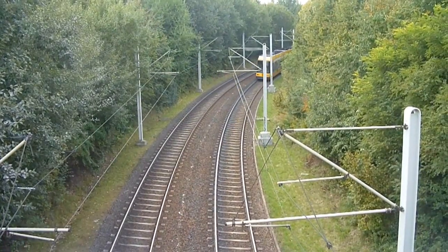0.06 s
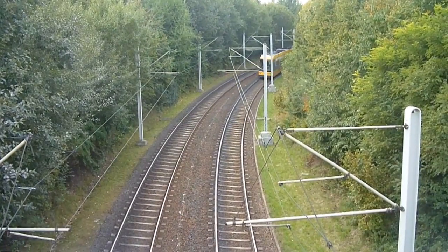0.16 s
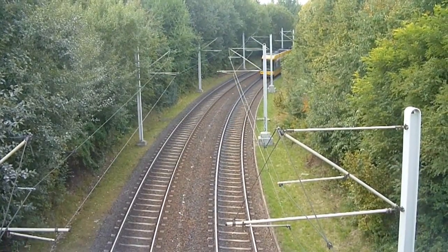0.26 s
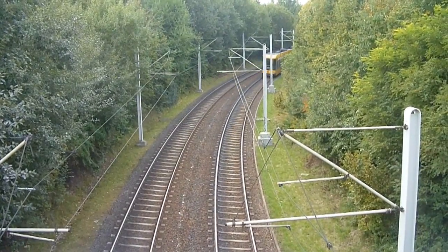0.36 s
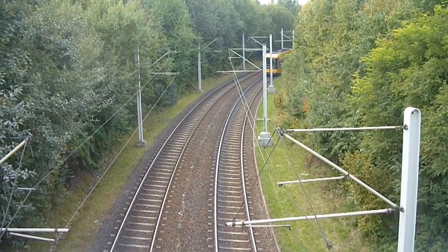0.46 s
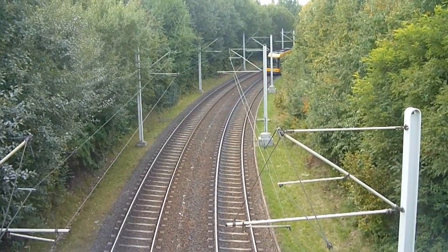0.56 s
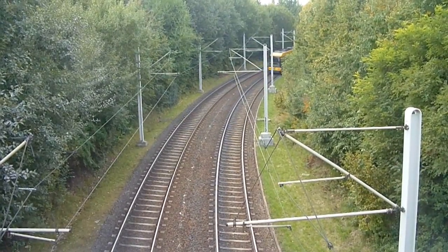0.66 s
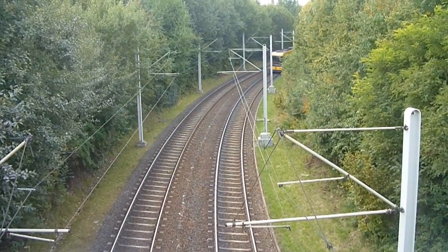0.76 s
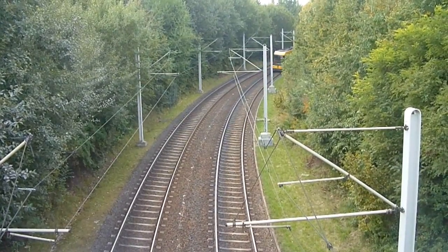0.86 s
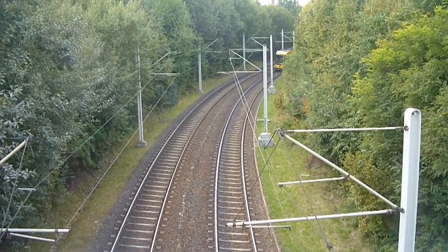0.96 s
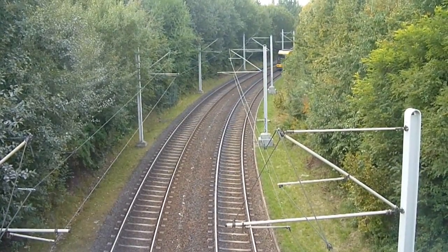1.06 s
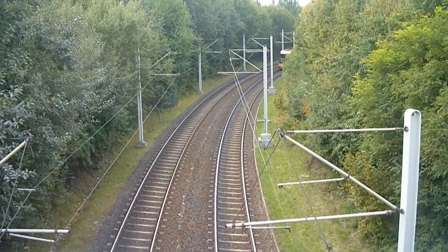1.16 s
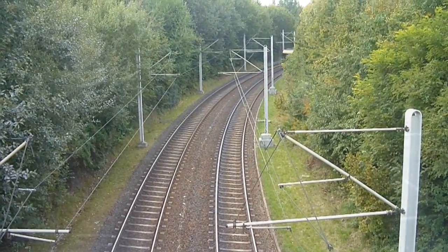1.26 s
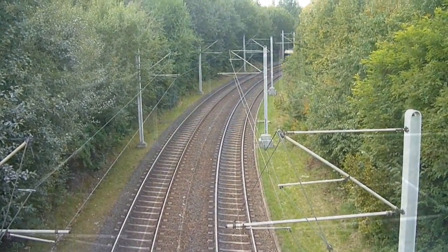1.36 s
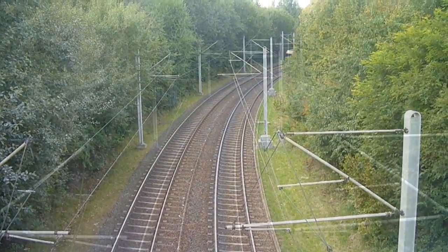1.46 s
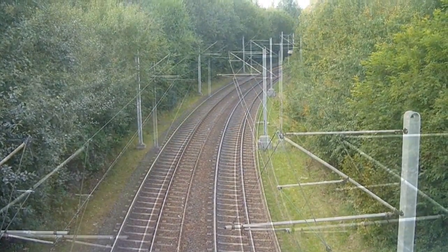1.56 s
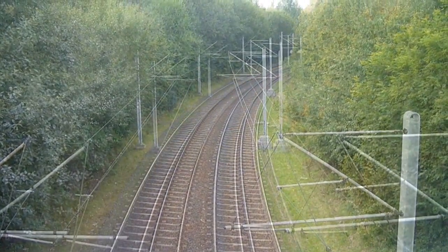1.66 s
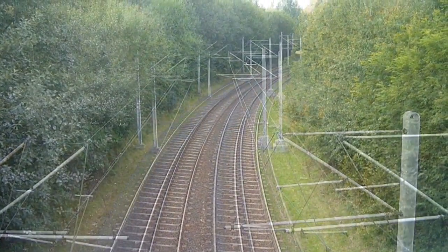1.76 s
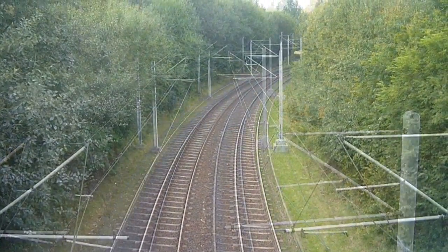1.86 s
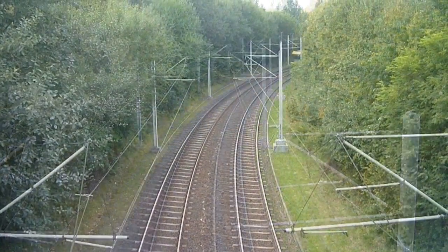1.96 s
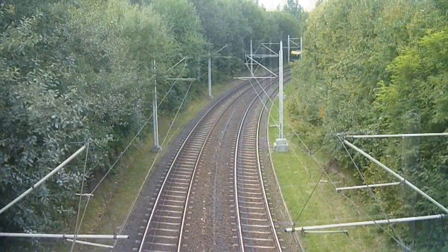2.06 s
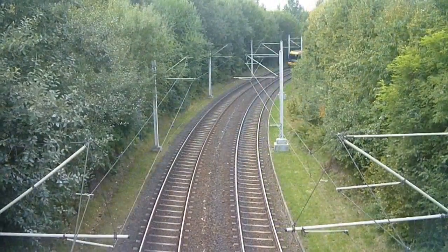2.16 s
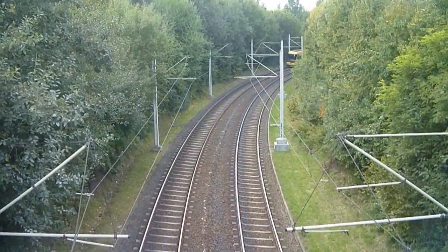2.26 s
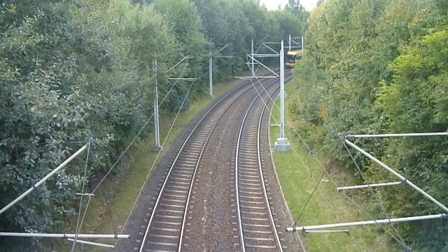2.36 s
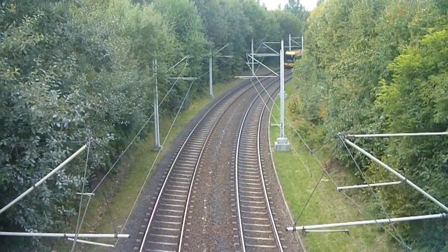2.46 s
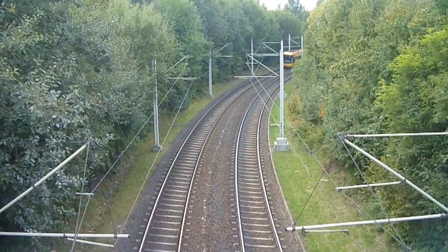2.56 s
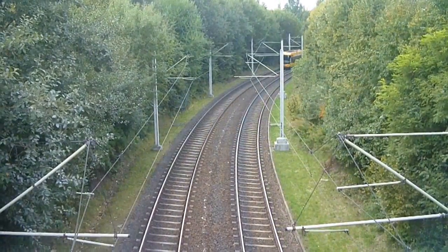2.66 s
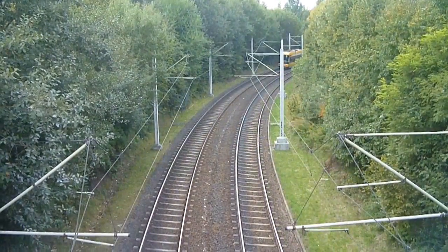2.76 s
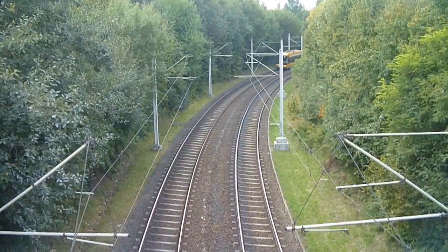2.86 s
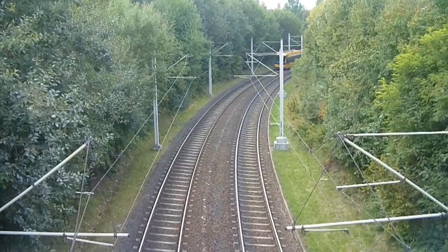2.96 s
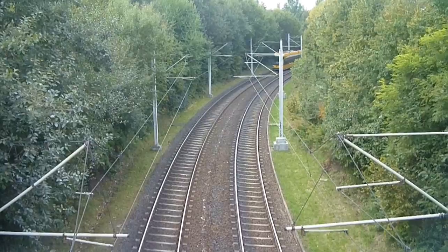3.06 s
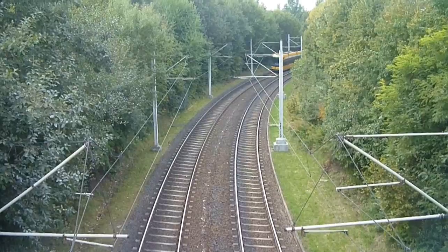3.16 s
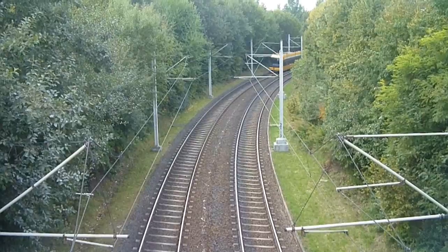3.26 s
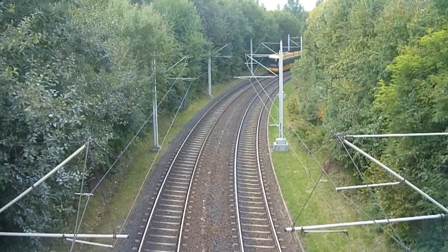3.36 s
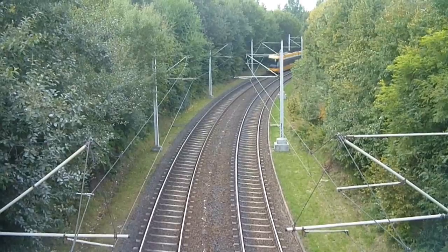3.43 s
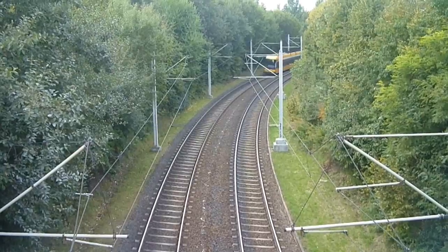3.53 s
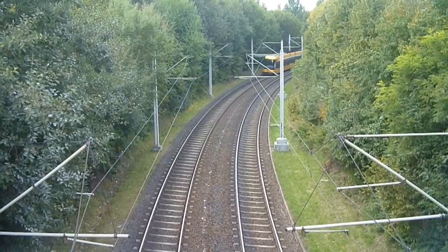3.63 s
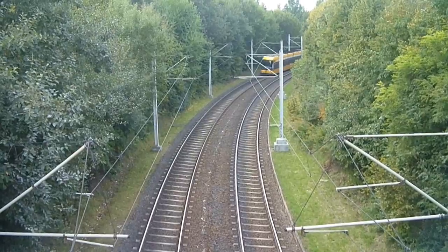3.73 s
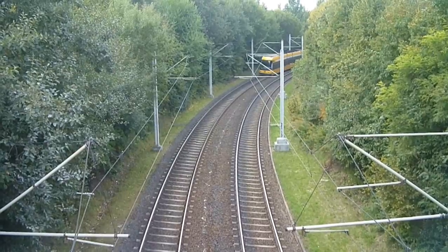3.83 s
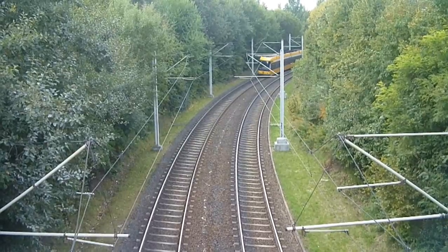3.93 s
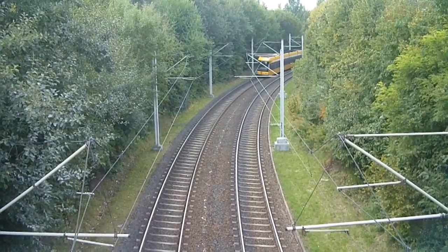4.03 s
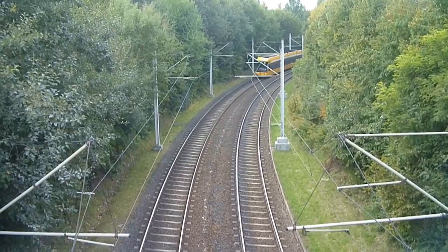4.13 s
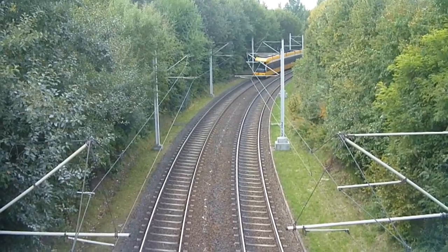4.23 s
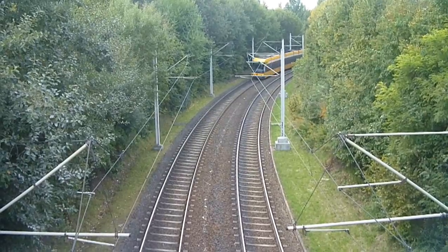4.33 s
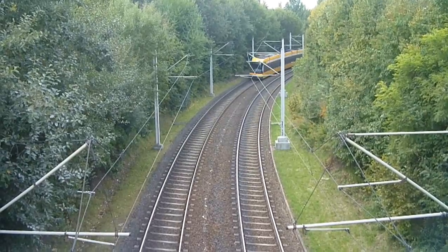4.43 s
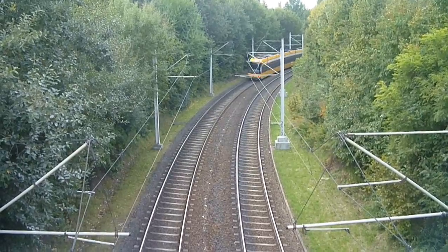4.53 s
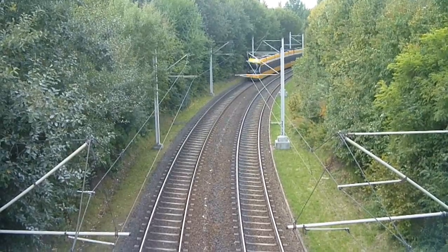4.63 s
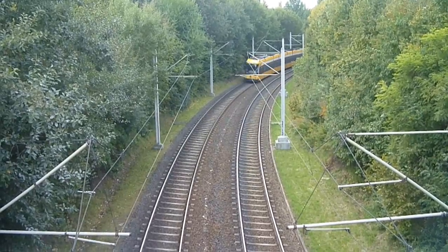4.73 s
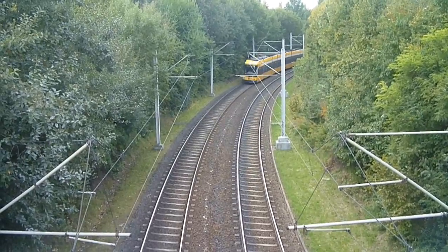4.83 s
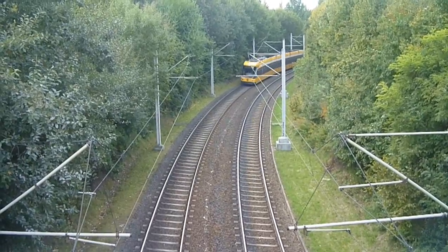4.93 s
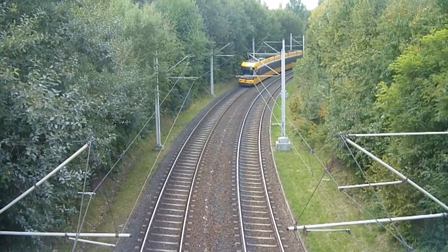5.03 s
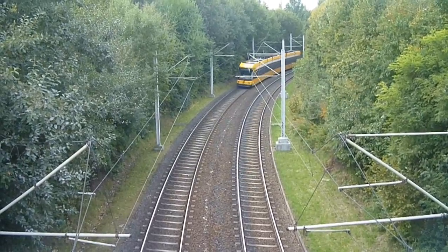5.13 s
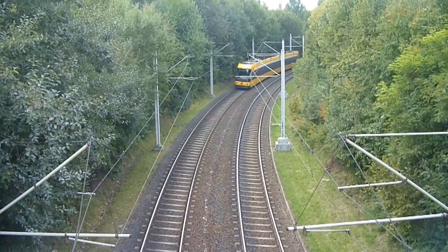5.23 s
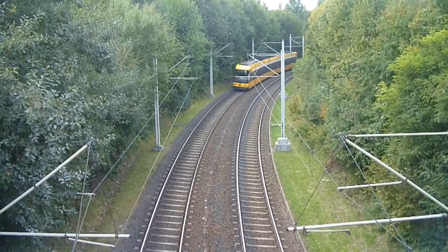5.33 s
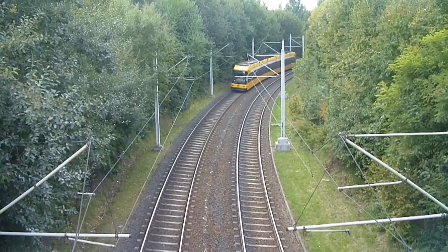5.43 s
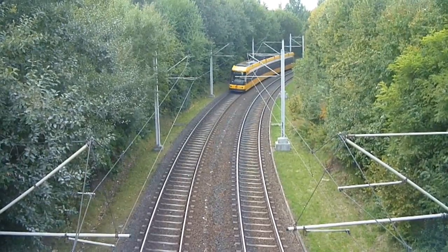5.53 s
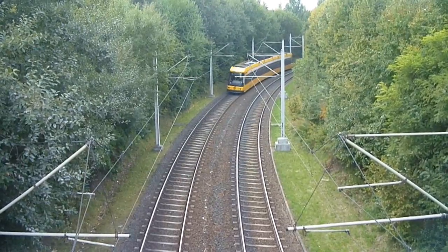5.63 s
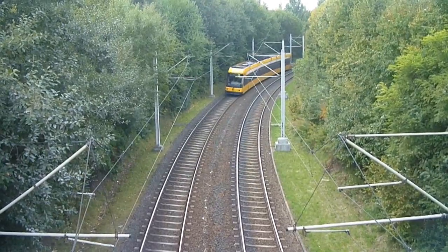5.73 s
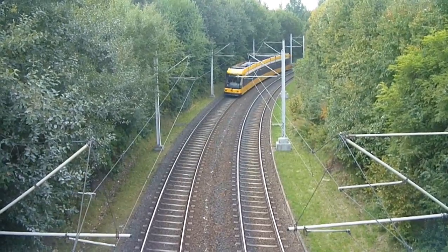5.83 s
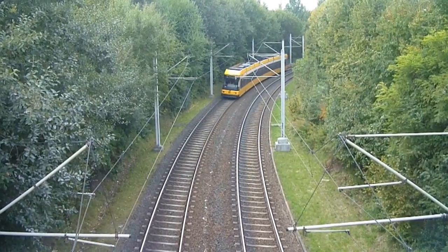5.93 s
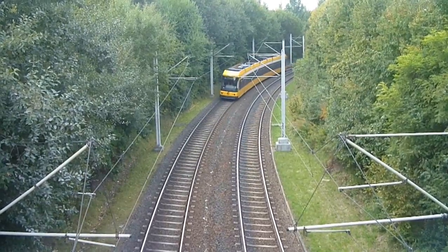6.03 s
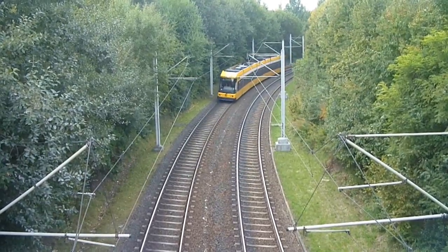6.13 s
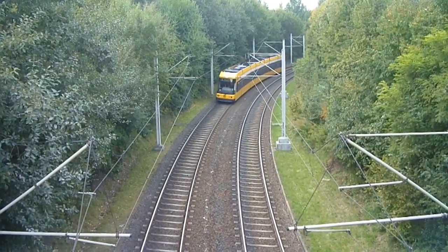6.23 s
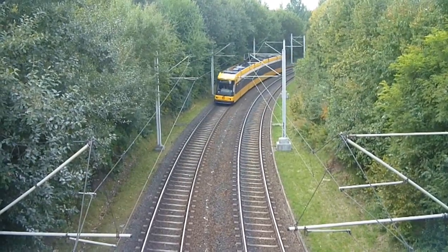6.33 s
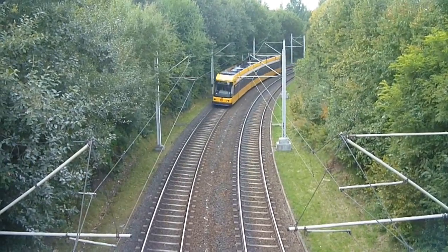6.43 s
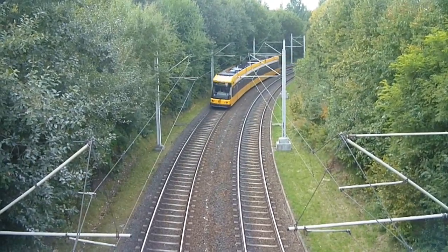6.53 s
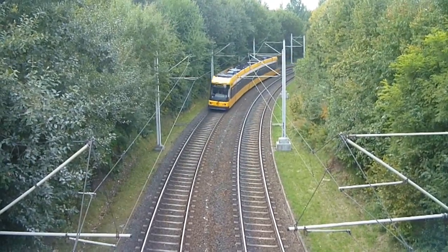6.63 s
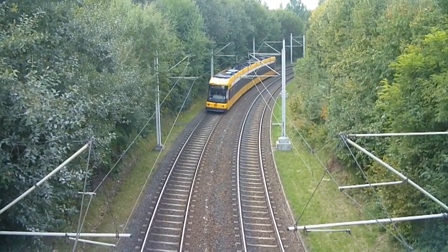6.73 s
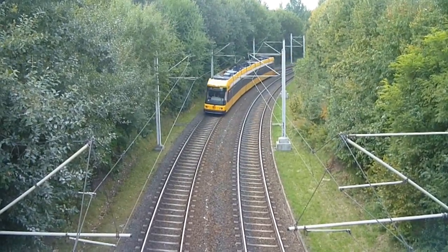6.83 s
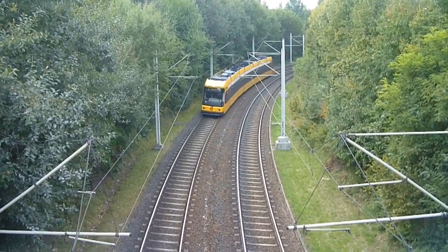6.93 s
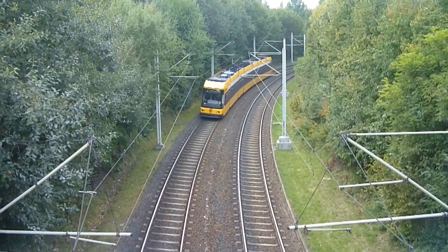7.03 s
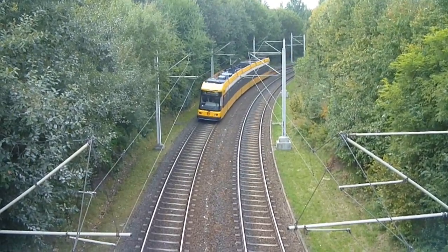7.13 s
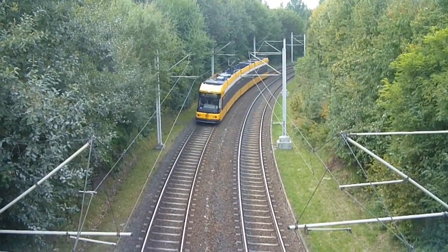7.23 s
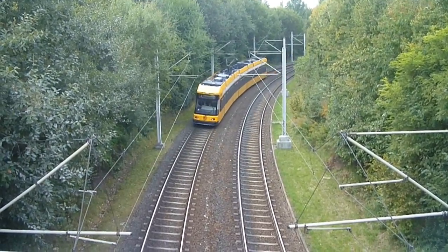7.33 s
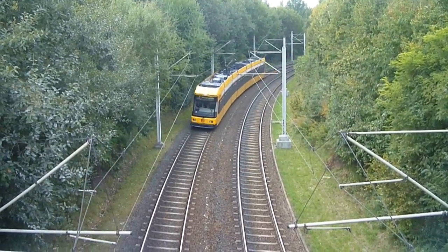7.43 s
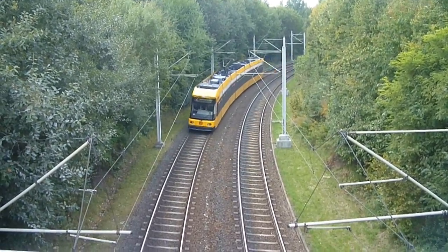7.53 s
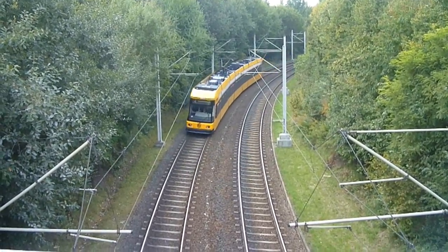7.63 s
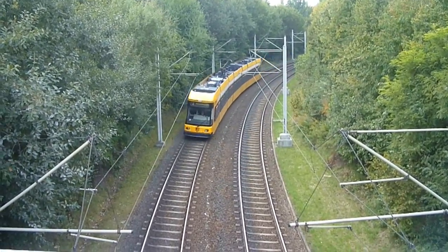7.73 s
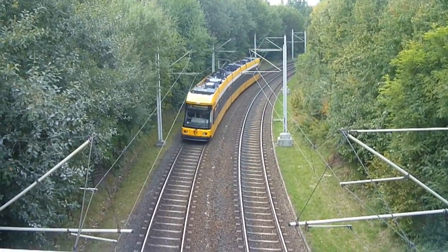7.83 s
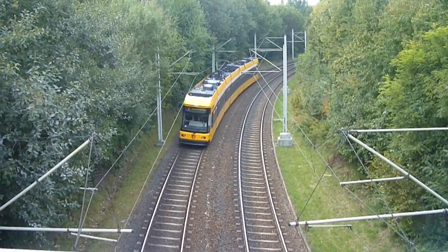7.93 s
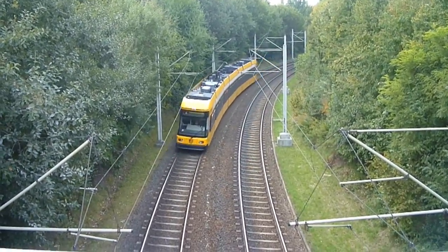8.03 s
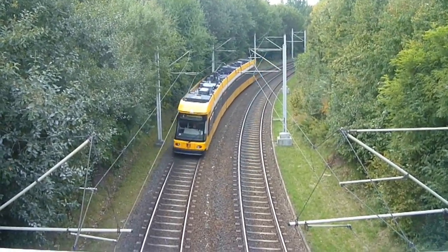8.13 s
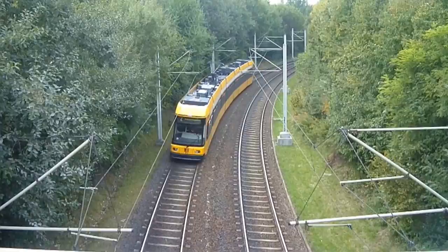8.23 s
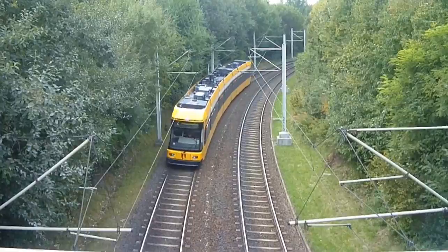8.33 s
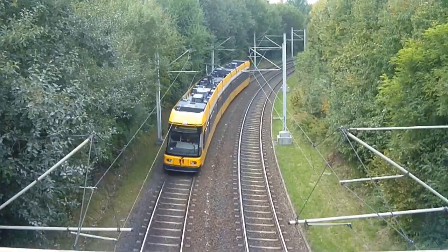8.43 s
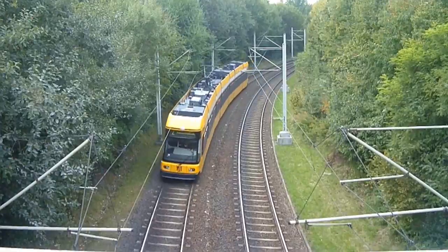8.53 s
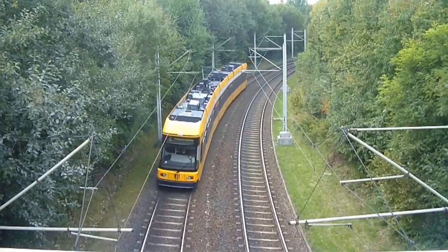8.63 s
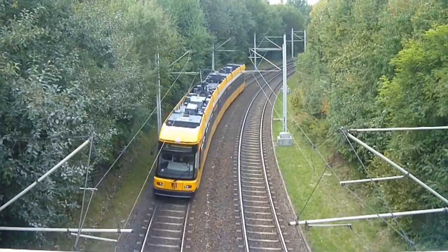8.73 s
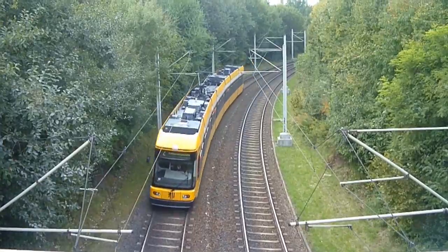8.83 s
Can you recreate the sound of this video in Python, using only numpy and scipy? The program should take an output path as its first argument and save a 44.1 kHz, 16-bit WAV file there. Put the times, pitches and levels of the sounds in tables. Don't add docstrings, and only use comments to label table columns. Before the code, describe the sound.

A heavy vehicle's rushing tyre noise and engine hum swell, then vanish in a hard edit. Much quieter, a tram approaches round a curve: rails hiss and ring ahead of it, flanges rub in uneven surges, brief wheel chirps stand out, and a high electrical whine and sizzling wire brighten. It gets louder until the end, never passing. Heard from a bridge over the track through a small stereo camera microphone.

```python
import sys
import numpy as np
from scipy import signal
from scipy.fft import rfft, irfft, next_fast_len
from scipy.io import wavfile
from scipy.ndimage import uniform_filter1d, map_coordinates

SR = 44100
rng = np.random.default_rng(int(sys.argv[2]) if len(sys.argv) > 2 else 0)


def transcribe(signal):
    frames = np.atleast_2d(signal).T
    limited = np.clip(frames, -1, 1)
    pcm = np.round(limited * 32767).astype(np.int16)
    wavfile.write(sys.argv[1], SR, pcm)


def voltage_ratio(level):
    return 10 ** (np.asarray(level, float) / 20)


N = 391608
SIZE = next_fast_len(N + 8192)
HZ = np.fft.rfftfreq(SIZE, 1 / SR)
TIME = np.arange(N) / SR

# start_s, firing_hz, load_db
ENGINE_RUN = [
    (0, 70.5, -17),
    (.4, 70.2, -16),
    (.8, 68.6, -13),
    (1.2, 66.5, -5),
    (1.6, 66, -2),
    (1.9, 66, 0),
    (2.1, 66.5, -5),
    (2.24, 66.5, -14),
]
# pitch_hz, likeness_0_to_1
ROAD_ALIKE = [(60, 0.56), (140, 0.95), (340, 1), (810, 0.98), (1930, 0.91), (4600, 0.79), (6500, 0.73),
              (7200, .5), (11000, 0.19)]
# pitch_hz, lean_db
ROAD_LEAN = [(60, 2), (140, 0), (340, 1), (810, 1.5), (1930, 1), (4600, 0), (11000, 5.5)]
# half_width_hz, depth_db
NOTCHES = [(206, -23), (158, -17), (102, -30), (120, -15)]
RAIL_FEELS = 0.6


def unit(x):
    return x / np.sqrt(np.mean(x ** 2) + 1e-20)


def along(points):
    hz, values = np.transpose(points)
    return np.interp(np.log(HZ + 1), np.log(hz + 1), values)


def curves(rows):
    s, *columns = np.transpose(rows)
    return [np.interp(TIME, s, column) for column in columns]


def swells(rows):
    total_db = 0
    for s, db, rise_s, fall_s in rows:
        side_s = np.where(TIME < s, rise_s, fall_s)
        total_db = total_db + db * np.exp(-((TIME - s) / side_s) ** 2)
    return total_db


def wobble(rate):
    coarse = TIME[::64]
    knots = rng.standard_normal(int(N * rate / SR) + 4)
    return np.interp(TIME, coarse, map_coordinates(knots, [coarse * rate]))


def rush(gain, patchy_db=0):
    real, imaginary = rng.standard_normal((2, 2, len(HZ)))
    pair = irfft((real + 1j * imaginary) * gain, SIZE)[:, :N]
    if patchy_db:
        z = signal.stft(pair, nperseg=512)[2]
        field = uniform_filter1d(rng.standard_normal(z.shape[1:]), size=5, axis=0)
        field = uniform_filter1d(field, size=12, axis=1)
        pair = signal.istft(z * voltage_ratio(patchy_db * unit(field)), nperseg=512)[1][:, :N]
    return unit(pair)


def ringing(hz, width_hz):
    return rush(1 / (1 + ((HZ - hz) / width_hz * 2) ** 2))


def modes(table, flicker_db, rate):
    return sum(voltage_ratio(db + flicker_db * wobble(rate)) * ringing(hz, width_hz) for hz, width_hz, db in table)


def tone(rows, orders, flicker_db):
    hz, *levels_db = curves(rows)
    turns = 2 * np.pi * np.cumsum(hz) / SR
    hum = 0
    for order, db in zip(orders, levels_db):
        hum = hum + voltage_ratio(db + flicker_db * wobble(4.1)) * np.sin(order * turns + order)
    present = (TIME >= rows[0][0]) * (TIME <= rows[-1][0] + .1)
    return np.sqrt(2) * hum * present * np.ones((2, 1))


def bursts(rows):
    waver = .5 * wobble(40)
    total = 0
    for s, db, length_s, hz in rows:
        envelope = np.exp(-((TIME - s) / length_s * 2) ** 4)
        total = total + voltage_ratio(db) * envelope * np.sin(2 * np.pi * hz * TIME + waver)
    return np.sqrt(2) * np.ones((2, 1)) * total


def notched(depths_db):
    centres_hz = [1400, 3290, 4892, 6550]
    gain = 1
    for hz, (width_hz, _), db in zip(centres_hz, NOTCHES, depths_db):
        off = ((HZ - hz) / width_hz) ** 2
        gain = gain * np.sqrt((off + voltage_ratio(2 * db)) / (off + 1))
    return gain


def ports(pair, alike, lean, lead):
    side_depths_db = [-15, -9, -11, -24]
    turn = np.arccos(np.clip(along(alike), -1, 1)) / 2
    shared_gain = np.cos(turn) * notched([db for _, db in NOTCHES])
    side_gain = np.sin(turn) * notched(side_depths_db)
    shared, side = rfft(pair, SIZE) * [shared_gain, side_gain]
    half = voltage_ratio(along(lean) / 2) * np.exp(.5j * along(lead))
    return irfft(np.array([(shared + side) * half, (shared - side) / half]), SIZE)[:, :N]


def engine():
    # multiple, full_load_db, growth_db_per_db, echo_swing_db
    firing = [
        (1, -66, 1, 0),
        (2, -69, 1.3, -1.5),
        (3, -81, -.3, 0),
        (6, -63.5, .5, 5),
    ]
    s, hz, load_db = np.transpose(ENGINE_RUN)
    echo = np.cos(2 * np.pi * (s - 1.85) / 1.45)
    levels_db = [db + grows * load_db + swing_db * echo for _, db, grows, swing_db in firing]
    return tone(np.transpose([s, hz, *levels_db]), [row[0] for row in firing], flicker_db=.6)


def road():
    # start_s, nearness_db
    passing = [(0, -49), (.5, -46.5), (1, -42), (1.25, -42.5), (1.34, -41), (1.45, -42), (1.76, -40.5),
               (2.07, -42.5), (2.24, -42)]
    # pitch_hz, density_db_per_hz
    roar_colour = [(18, -61), (30, -52), (59, -32), (96, -44), (135, -23), (162, -23.5), (391, -9.5),
                   (1020, 2.5), (1200, 1.5), (1390, -1), (1700, -3.5), (2210, -29), (3740, -120)]
    hiss_colour = [(760, -30), (1300, -39), (1400, -5), (1550, -2.5), (1770, 0), (2920, -5.5), (3320, -11),
                   (4010, -7), (4600, -10), (4920, -18.5), (5250, -12), (5830, -15), (6500, -31),
                   (6860, -28.5), (9610, -29.5), (10800, -38.5), (11400, -41.5), (14800, -83),
                   (22000, -120)]
    # pitch_hz, density_db_per_hz
    body_colour = [(150, -52), (230, -3), (300, 2.5), (480, 1), (620, 7), (900, -39)]
    # start_s, pitch_hz, level_db
    axle = [(.6, 640, -68), (.8, 655, -62), (1.15, 685, -61), (1.3, 700, -56), (1.5, 720, -60),
            (1.7, 738, -60), (2.1, 765, -66)]
    # start_s, pitch_hz, level_db
    turbo = [
        (1.25, 2620, -80),
        (1.42, 2630, -63),
        (1.55, 2655, -67),
        (1.66, 2670, -61),
        (1.8, 2675, -82),
    ]
    # middle_s, peak_db, length_s, pitch_hz
    tinkles = [(.66, -79, .04, 9480), (.85, -77, .025, 9420), (.92, -78, .03, 8720), (.955, -73, .02, 8700),
               (.955, -73, .025, 9800), (.98, -78, .03, 9450), (1.02, -78, .03, 8600),
               (1.13, -76, .03, 9450), (1.6, -76, .02, 8600), (1.685, -73, .015, 9500),
               (1.69, -76, .015, 8950), (1.92, -76, .02, 9450), (1.995, -73, .025, 9520)]
    near_db, = curves(passing)
    load_db = curves(ENGINE_RUN)[1]
    past_s = np.maximum(TIME - 1.78, 0)
    hiss_db = -44.5 + 0.21 * (near_db + 43.5) - 6 * past_s
    roar = voltage_ratio(near_db - 0.42 + 0.34 * wobble(9.2)) * rush(voltage_ratio(along(roar_colour)), patchy_db=0.36)
    hiss = voltage_ratio(hiss_db + 0.6 * wobble(9.5)) * rush(voltage_ratio(along(hiss_colour)), patchy_db=0.7)
    body = voltage_ratio(-55.5 + 0.91 * load_db) * rush(voltage_ratio(along(body_colour)), patchy_db=0.5)
    noise = ports(roar + hiss + body, ROAD_ALIKE, ROAD_LEAN, [(1, 0)])
    whines = tone(axle, [1], flicker_db=-5.0) + tone(turbo, [1], flicker_db=9.5)
    return noise + engine() + whines + bursts(tinkles)


def distance():
    # pitch_hz, density_db_per_hz
    far_colour = [(20, -28), (65, -14), (110, -21), (200, -20), (400, -33), (800, -1), (1100, 1),
                  (1550, 10), (2200, -16), (3000, -22), (6000, -50)]
    far = voltage_ratio(-64.5 + 1.4 * wobble(7.0)) * rush(voltage_ratio(along(far_colour)), patchy_db=2.0)
    return ports(far, ROAD_ALIKE, ROAD_LEAN, [(1, 0)])


def drive():
    # start_s, current_db, converter_load_db
    current = [(1.3, -75, 5), (1.6, -77, 5), (1.95, -67.5, -1), (2.18, -78, 2), (2.6, -75.5, 2),
               (2.85, -70, -8), (3.05, -66.5, -0.5), (3.65, -61, -3.5), (4.7, -59, 0.5), (5.5, -58, -1.5),
               (6.05, -55.5, 1), (6.5, -57.5, 5.5), (7.4, -49.5, 0), (7.85, -48.5, 0.5), (8.05, -43.5, 1),
               (8.88, -45.5, 1.5)]
    # peak_s, change_db, rise_s, fall_s
    dropouts = [
        (2.36, 1, .05, 0.27),
        (2.77, -6, 0.073, 0.027),
        (3.39, -6, 0.12, 0.11),
        (4.97, -2, 0.1, 0.076),
        (5.75, -6.5, 0.089, 0.05),
        (6.24, -4, 0.11, 0.027),
        (8.4, -8.5, 0.16, 0.069),
    ]
    # peak_s, change_db, rise_s, fall_s
    top_swells = [
        (4, -4, .9, .4),
        (4.85, -5, .2, .15),
        (4.55, 4, .03, .03),
        (5.25, 3, .15, .25),
        (5.95, 3.5, .15, .1),
        (6.25, -7, .12, .15),
        (6.7, 2.5, .1, .4),
        (7.7, 2, .3, .4),
        (8.6, -7, .04, .05),
        (8.8, 3, .08, .1),
    ]
    # multiple, width_hz, level_db
    overtones = [(4, 120, -16), (5, 145, -0.5), (6, 290, -11.5)]
    top_overtones = [(7, 300, -31), (8, 280, -32.5)]
    # pitch_hz, density_db_per_hz
    fizz_colour = [(5800, -52), (6400, -2.5), (6900, 1.5), (7500, -5), (7800, 1), (8070, -7), (8300, 3.5),
                   (8600, -1), (9350, -14.5), (9900, -17.5), (10300, -11), (10900, -17.5), (11300, -28),
                   (12000, -80)]
    sparkle_colour = [(10500, -60), (11200, 0), (12000, -6), (13600, -9), (13700, -90)]
    whine_hz = 1667
    current_db, load_db = curves(current)
    fizz_db = current_db + swells(dropouts)
    whine = modes([(k * whine_hz, w, db) for k, w, db in overtones], flicker_db=-0.5, rate=23)
    top = modes([(k * whine_hz, w, db) for k, w, db in top_overtones], flicker_db=0.5, rate=30)
    top = top + voltage_ratio(-27.5) * rush(voltage_ratio(along(sparkle_colour)), patchy_db=3.5)
    wire = rush(1 / (1 + ((HZ - 7050) / 150) ** 4))
    wire_db = -5 - 0.43 * (current_db + 56.0)
    fizz = rush(voltage_ratio(along(fizz_colour)), patchy_db=0.5) + voltage_ratio(wire_db + 0.8 * wobble(14)) * wire
    whine = voltage_ratio(fizz_db + load_db + 0.9 * wobble(14)) * whine
    fizz = voltage_ratio(fizz_db + 1.5 + 0.43 * wobble(16)) * fizz
    return whine + fizz + voltage_ratio(fizz_db + swells(top_swells) + 2.0) * top


def contact():
    # start_s, nearness_db, flange_pressure_db, rim_slip_db
    approach = [(2.27, -72, 4.5, -4), (2.92, -69, -1.5, -1.5), (3.1, -64, -0.5, 0),
                (3.47, -63.5, 1.5, -1.5), (4, -60.5, 4, -2), (5.05, -57.5, 2.5, -1), (5.8, -56, 2, -1.5),
                (6.5, -53, 2, -1.5), (7.35, -50, 4, 1), (8, -49, 6.5, 2), (8.43, -47, 0, 2.5),
                (8.88, -46.5, 7, 4.5)]
    # peak_s, change_db, rise_s, fall_s
    surges = [(2.62, 5, 0.086, 0.13), (3.2, 5.5, 0.12, 0.29), (3.77, 7, 0.14, 0.17),
              (4.15, 3, 0.097, 0.074), (4.48, 3.5, 0.17, 0.22), (4.78, 3.5, 0.1, 0.11),
              (5.07, -2, 0.079, 0.096), (5.22, 3, 0.044, 0.055), (5.58, 4.5, 0.29, 0.13),
              (5.86, -1, .04, 0.039), (6.09, 5, 0.19, 0.11), (6.33, -0.5, 0.041, 0.045),
              (7.1, 3, 0.14, 0.082), (7.53, 0.5, 0.1, 0.059), (7.8, 0.5, .08, .08),
              (8.21, 5.5, 0.14, 0.094), (8.35, 2, 0.023, 0.033), (8.52, 3, 0.051, 0.097)]
    # peak_s, change_db, rise_s, fall_s
    bites = [
        (3.04, 2.5, .02, 0.074),
        (4.88, 0.5, .1, .06),
        (5.02, 0.5, .05, .06),
        (6.06, -0.5, .08, 0.087),
        (7.08, 2.5, 0.055, 0.074),
        (7.41, 3, 0.036, 0.099),
        (8.21, 2, .03, 0.055),
        (8.685, 2.5, .004, 0.061),
        (8.8, 0.5, .08, .12),
    ]
    near_db, pressure_db, slip_db = curves(approach)
    return near_db, pressure_db + swells(surges), slip_db + swells(bites)


def wheels():
    # pitch_hz, density_db_per_hz
    rolling_colour = [(18, -76), (35, -60), (91, -32), (190, -21), (325, -15), (378, -15), (418, -14),
                      (974, 2), (1190, 0.5), (1410, -11), (1700, -1), (2210, -12), (3740, -120)]
    rail_colour = [(760, -43), (1300, -9.5), (1410, -3.5), (1670, -10), (2450, -3.5), (3220, -7.5),
                   (3500, -2), (4550, -23), (7700, -120)]
    flange_colour = [(1880, -48), (3200, -9.5), (3710, -1), (4360, -1.5), (4780, -10.5), (4860, -11),
                     (5000, -3.5), (6500, -14.5), (11000, -120)]
    rim_colour = [(2820, -36), (4780, -5), (4930, -8), (5200, 0.5), (5450, -1), (5650, -3), (5950, -6.5),
                  (6350, -28), (6700, -55), (8710, -45), (14700, -120)]
    # pitch_hz, width_hz, level_db
    rail_modes = [(1967, 69, -12), (2418, 160, -10), (2664, 90, -13)]
    web_modes = [(4020, 52, -15), (4234, 100, -8), (4440, 130, -9)]
    rim_modes = [(5035, 78, -6), (5125, 150, -5), (5210, 32, -5.5), (5310, 68, -6.5), (5490, 140, -8.5)]
    # peak_s, change_db, rise_s, fall_s
    rough = [
        (2.47, 3.5, .04, 0.045),
        (3.2, 3.5, 0.028, 0.17),
        (3.68, 1, 0.073, .1),
        (5.87, 2.5, 0.056, 0.29),
        (7.7, 2.5, 0.14, 0.072),
        (8.2, 2, 0.26, .18),
        (8.65, -0.5, .04, .03),
        (8.74, 2, 0.072, 0.086),
    ]
    # peak_s, change_db, rise_s, fall_s
    shrieks = [
        (3.3, 20, .03, .04),
        (4.4, 13, .05, .05),
        (8.24, 14, .04, .04),
        (8.685, 30, 0.0055, 0.051),
        (8.8, 18, 0.072, 0.067),
    ]
    near_db, force_db, slip_db = contact()
    grip = wobble(13)
    rolling_db = near_db + swells(rough) + 2.5 + 0.25 * wobble(17)
    rolling = voltage_ratio(rolling_db) * rush(voltage_ratio(along(rolling_colour)), patchy_db=0.38)
    rail = rush(voltage_ratio(along(rail_colour)), patchy_db=0.5) + modes(rail_modes, flicker_db=2.0, rate=9)
    flange = rush(voltage_ratio(along(flange_colour)), patchy_db=2.5) + modes(web_modes, flicker_db=1.5, rate=15)
    rim = rush(voltage_ratio(along(rim_colour)), patchy_db=1.5) + modes(rim_modes, flicker_db=1.7, rate=13)
    rail = voltage_ratio(RAIL_FEELS * force_db + 3.0 + 0.6 * grip) * rail
    flange = voltage_ratio(force_db + 0.7 + 0.44 * grip) * flange
    rim = voltage_ratio(0.87 * force_db + slip_db + 0.2 + 0.5 * grip) * rim
    shriek = voltage_ratio(-9 + swells(shrieks)) * ringing(4995, width_hz=77)
    return rolling + voltage_ratio(near_db) * (shriek + rail + flange + rim)


def rail_lines():
    # pitch_hz, width_hz, level_db
    lines = [(301, 8, -29), (948, 12, -12), (1071, 14, -14), (2019, 30, -15)]
    near_db, force_db, _ = contact()
    gain = voltage_ratio(-62 + .45 * (near_db + RAIL_FEELS * force_db + 61.5))
    return gain * modes(lines, flicker_db=1.5, rate=5)


def squeak():
    # middle_s, peak_db, length_s, pitch_hz
    squeaks = [(2.635, -67, .04, 3700), (3.197, -62, .045, 948), (3.24, -69, .05, 950),
               (3.195, -64, .04, 3710), (3.765, -58, .04, 3710), (4.705, -63, .04, 950),
               (4.47, -57, .03, 3740), (4.54, -53, .04, 3740), (4.78, -53, .06, 3760),
               (5.19, -56, .07, 3760), (5.39, -58, .05, 3760), (5.473, -52, .02, 3760),
               (5.535, -55, .06, 3755), (5.607, -47, .06, 3745), (5.648, -54, .02, 3780),
               (5.78, -50, .085, 3775), (6.29, -55, .04, 3760), (6.333, -44, .028, 3765),
               (6.335, -50, .025, 3580), (7.08, -51, .03, 3700), (8.08, -48, .03, 3700),
               (8.25, -45, .05, 3640)]
    # middle_s, peak_db, length_s, pitch_hz
    flares = [
        (5.9, -66, .3, 798),
        (6.25, -68, .6, 675),
        (7.95, -61, .2, 680),
        (8.05, -52, .18, 2410),
        (7.38, -57, .12, 1985),
        (8.78, -50, .1, 3930),
    ]
    near_db, force_db, _ = contact()
    return bursts(squeaks + flares) + voltage_ratio(near_db + force_db - 9.5) * ringing(3680, width_hz=110)


def tram():
    # pitch_hz, likeness_0_to_1
    alike = [(60, 0.99), (900, 0.99), (1600, 1), (2000, 0.92), (2500, 1), (3000, 0.93), (3400, 0.99),
             (3700, 0.93), (4200, 0.9), (5300, 0.93), (6200, 0.83), (7000, 0.9), (8300, 0.84), (9400, 0.94),
             (9900, 0.68), (11000, 0.34)]
    # pitch_hz, lean_db
    lean = [(100, -0.5), (800, 1.5), (1500, 0), (3600, -0.1), (4700, 1.5), (5200, 3), (6000, 3.5),
            (6800, 4), (8300, 5.5), (9400, 13), (10000, 4), (10800, 2.5), (11600, 1.5), (13500, -1.5)]
    # pitch_hz, lead_radians
    lead = [(0, 0.17), (2300, 0.15), (3150, 0.14), (3600, 0.01), (5170, 0.39), (6460, -0.067), (6980, 0.59),
            (11100, -0.59)]
    # start_s, pitch_hz, level_db
    singing = [(2.25, 2015, -79), (2.85, 2010, -83), (2.93, 2000, -72), (2.98, 2000, -68),
               (3.05, 2005, -73), (3.3, 2010, -72), (3.5, 2015, -78), (3.75, 2019, -69), (3.95, 2019, -75),
               (4.15, 2019, -66), (4.5, 2019, -68), (4.9, 2019, -66), (5.6, 2015, -66), (6.5, 2015, -66),
               (7.2, 2010, -64)]
    traction = [(4.8, 588, -80), (5.3, 640, -73), (5.8, 684, -69), (6.3, 708, -73), (6.6, 728, -66),
                (6.85, 736, -61), (7.1, 748, -66), (7.4, 760, -74)]
    gear = [(4.3, 390, -92), (5.5, 388, -84), (6.5, 387.5, -77), (7.5, 387.5, -70), (8.1, 387.5, -66),
            (8.88, 388, -62)]
    # start_s, pitch_hz, half_order_db, first_order_db, one_and_a_half_order_db
    motor = [(4.3, 98, -100, -102, -96), (4.8, 105, -96, -95, -92), (5.5, 118, -94, -89, -89),
             (6, 126, -92, -86, -95), (6.5, 131.5, -92, -83, -90), (7, 137, -92, -81, -84),
             (7.7, 143, -100, -80, -88), (7.95, 143, -108, -100, -100)]
    noise = ports(wheels() + squeak() + drive() + rail_lines(), alike, lean, lead)
    tones = sum(tone(rows, [1], flicker_db=1.2) for rows in (gear, traction, singing))
    tones = tones + tone(motor, [.5, 1, 1.5], flicker_db=1.2)
    return noise + tones + distance()


def starved(x):
    z = signal.stft(x, SR, nperseg=2048)[2]
    bands = z[:, :1016].reshape(2, 127, 8, -1)
    level_db = 10 * np.log10(np.mean(np.abs(bands) ** 2, axis=2) + 1e-20)
    band = np.arange(127)[:, None]
    loudness_db = level_db[:, 58:60].mean(axis=(0, 1))
    masking_db = .55 * (loudness_db + 90) + 4 * (band < 70)
    limit_db = -98.3 + masking_db + rng.normal(0, 2.2, level_db.shape[1:])
    keep = ((level_db.max(axis=0) > limit_db) | (band < 63)) & (band < 80)
    z[:, :1016] = (bands * keep[:, None, :]).reshape(2, 1016, -1)
    return signal.istft(z, SR, nperseg=2048)[1][:, :N]


def narrowed(x):
    # start_s, urge_in_spreads_of_chance
    urge = [(2.2, -2), (2.3, -.2), (3.2, .7), (3.8, 0), (4.6, -.3), (5.25, .9), (5.6, -.1), (6.3, -.9),
            (6.75, .6), (7.1, 0), (7.7, .3), (7.95, 1.9), (8.88, 2)]
    low_hz, high_hz, tilt = 1250, 3500, 1.1
    hz, t, side = signal.stft((x[0] - x[1]) / 2, SR, nperseg=2048)
    chance = rng.standard_normal((len(hz) // 12 + 1, len(t)))
    chance = unit(uniform_filter1d(chance, size=3, axis=1)).repeat(12, axis=0)[:len(hz)]
    place = (hz[:, None] - (low_hz + high_hz) / 2) / (high_hz - low_hz) * 2
    lost = (chance < np.interp(t, *np.transpose(urge)) + tilt * place) & (np.abs(place) < 1)
    gone = signal.istft(side * lost, SR, nperseg=2048)[1][:N]
    return x - [gone, -gone]


def scene():
    road_end_s, tram_start_s = 2.2444, 1.272
    lorry = starved(road())
    slip_in = np.clip((TIME - tram_start_s) / .004, 0, 1)
    last = lorry[:, int(road_end_s * SR), None]
    swing = (.011 - last) * np.exp(np.minimum(TIME - road_end_s, 0) / .0003)
    return (lorry + swing) * (TIME < road_end_s) + narrowed(starved(tram())) * slip_in


def band_limit(x):
    return signal.sosfilt(signal.butter(12, 15900, fs=SR, output="sos"), x)


def record(dry):
    return band_limit(dry)


dry = scene()
out = record(dry)
transcribe(out)
```